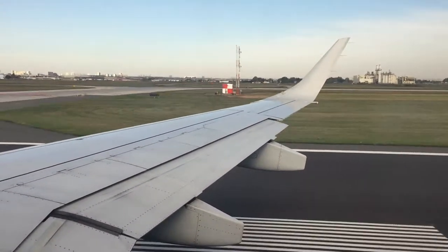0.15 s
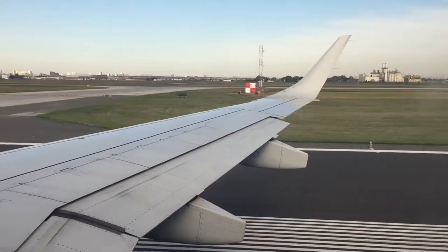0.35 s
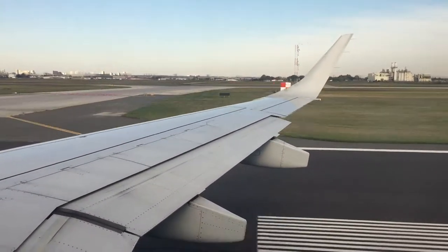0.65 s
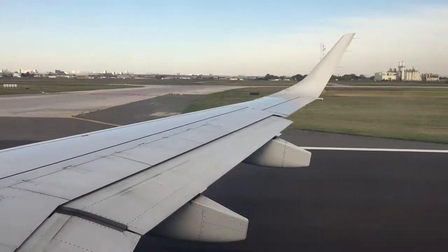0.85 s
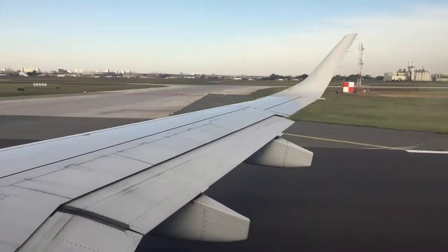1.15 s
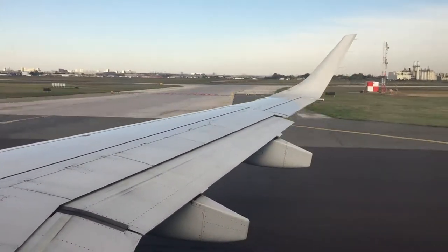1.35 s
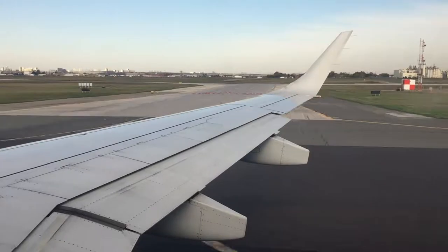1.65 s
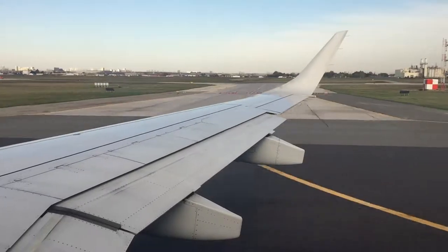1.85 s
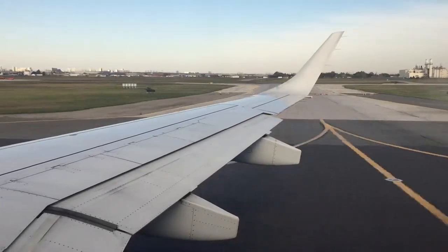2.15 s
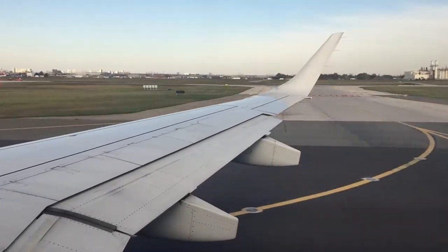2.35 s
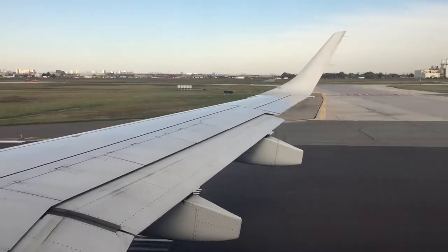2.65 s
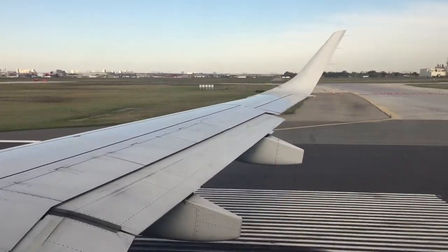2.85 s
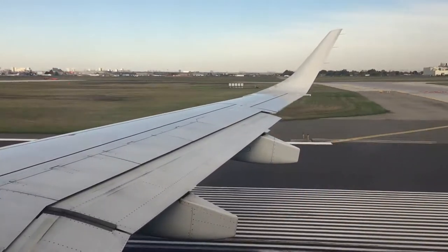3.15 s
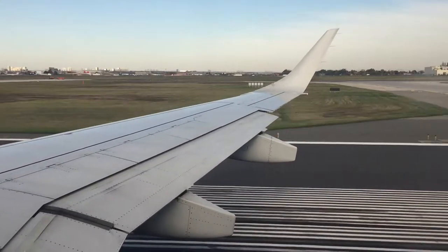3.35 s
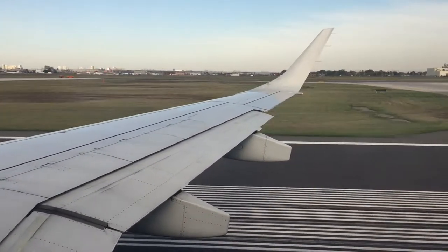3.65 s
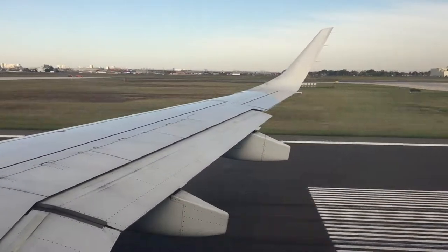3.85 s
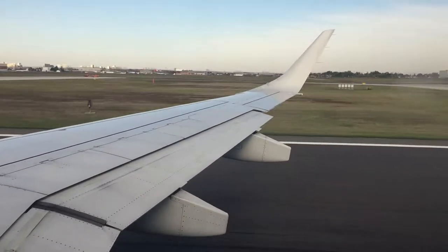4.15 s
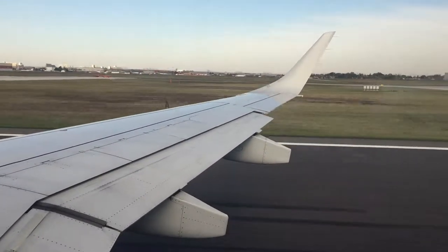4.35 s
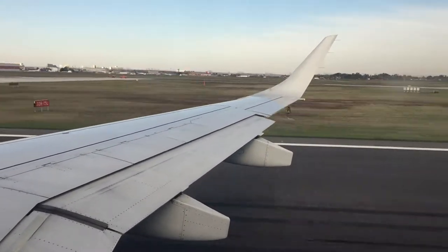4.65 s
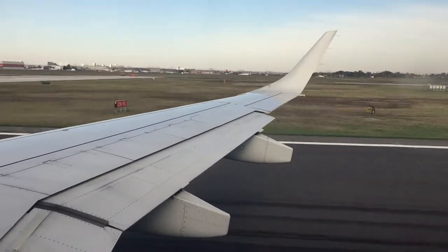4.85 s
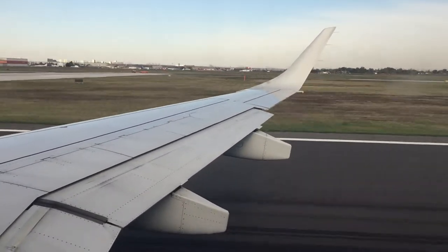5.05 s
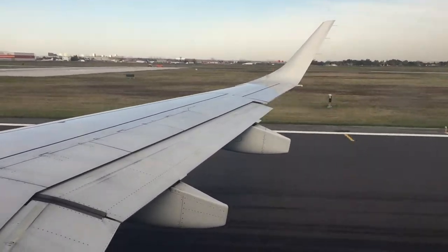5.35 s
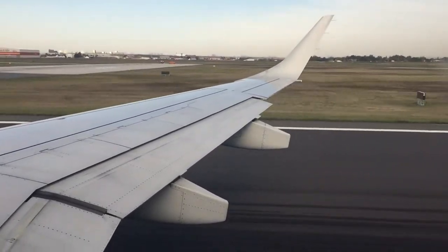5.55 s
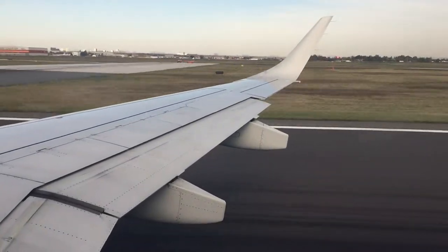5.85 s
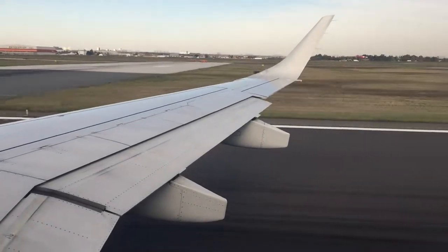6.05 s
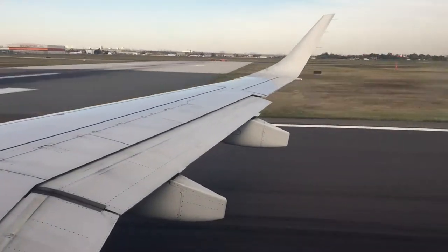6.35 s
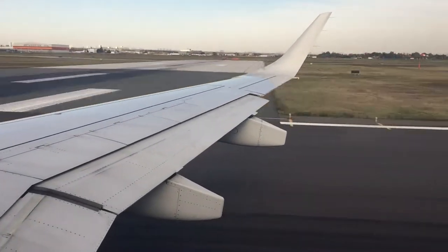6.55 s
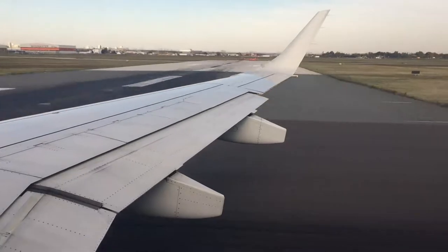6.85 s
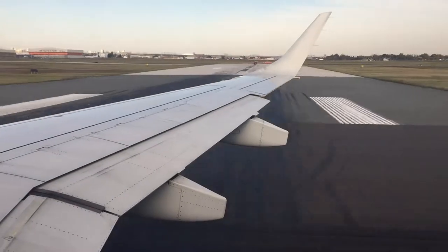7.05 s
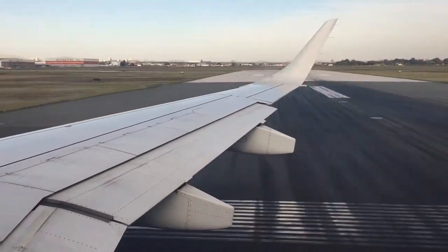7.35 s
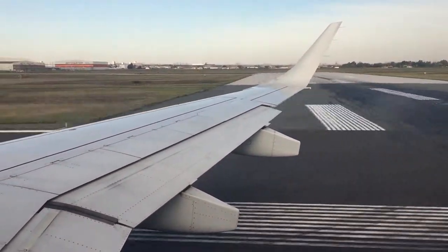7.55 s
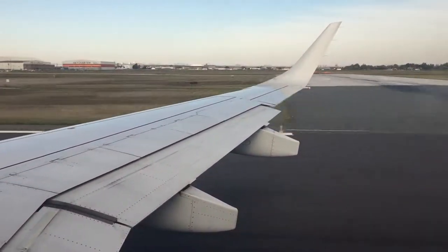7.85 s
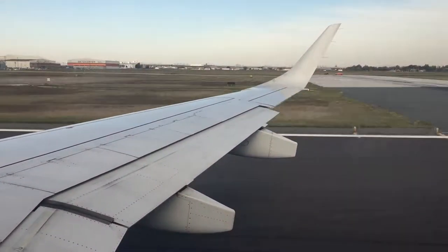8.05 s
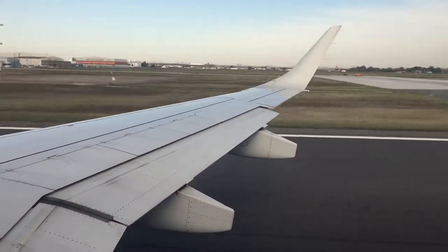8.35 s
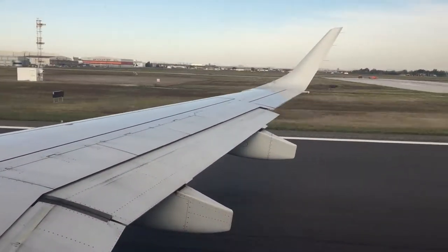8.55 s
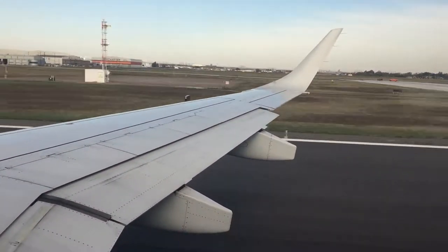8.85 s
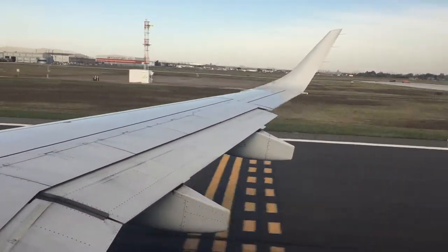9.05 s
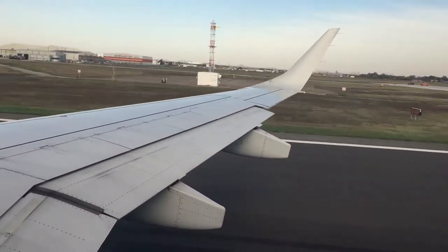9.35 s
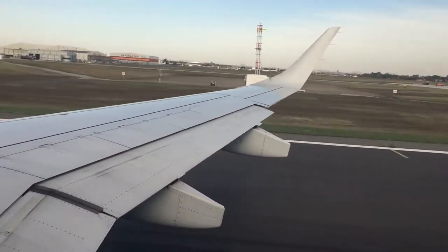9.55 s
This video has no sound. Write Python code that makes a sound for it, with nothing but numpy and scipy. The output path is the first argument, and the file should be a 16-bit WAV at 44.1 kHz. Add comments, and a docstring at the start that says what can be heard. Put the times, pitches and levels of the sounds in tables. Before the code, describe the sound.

A deep, booming roar of jet engines and rolling wheels fills an airliner cabin for the whole ten seconds or so, heard from a window seat behind the wing. The power holds steady, while the low rumble swells gently about once a second, most strongly around 8.5 seconds. Above it sit a low drone, wavering engine tones and a quieter turbine whine that keeps its pitch, briefly brightening near 5 seconds. Close by, loose plastic trim ticks and buzzes faintly in short, irregular fits throughout, a little harder around 3.4, 4.3 and 8.4 to 8.8 seconds. A small metal catch gives tiny high pings near 5.1, 6.9 and 8.7 seconds. At about 6.9 seconds a hard plastic fitting snaps once with a dry click. Behind everything, cabin air hisses softly with a very faint, high, fluttering whistle.

```python
"""A deep, booming roar fills an airliner cabin at takeoff power, at a window seat behind the wing.
Exhaust and wheels rumble through the fuselage, the boom swelling now and then; the engines
lay steady tones and bands of whine on top. Close by, loose trim buzzes in short fits at the rate of
the fan shaft, a plastic fitting clicks once and a metal catch pings. Behind it all, air hisses and
whistles thinly."""
import sys
import numpy as np
from scipy import signal
from scipy.fft import rfft, irfft, next_fast_len
from scipy.io import wavfile
from scipy.ndimage import uniform_filter1d

SR = 44100
rng = np.random.default_rng(int(sys.argv[2]) if len(sys.argv) > 2 else 0)


def persist_wave(psi):
    """Save psi, clipped to +-1, as 16-bit WAV."""
    counts = np.round(np.clip(psi, -1, 1) * 32767).astype(np.int16)
    wavfile.write(sys.argv[1], SR, np.atleast_2d(counts).T)


N = 427769
TIME = np.arange(N) / SR
SIZE = next_fast_len(N, real=True)
FREQS = np.maximum(np.arange(SIZE // 2 + 1) * SR / SIZE, 1)

# bed of exhaust and wheel roar through the wall: f/Hz, density/(dB per Hz)
ROAR_SPECTRUM = [(20, -67.5), (30, -76.5), (48, -47.5), (100, -38), (200, -46.5), (320, -57), (440, -59.5),
                 (510, -66.5), (720, -68.5), (830, -73.5), (1350, -79.5), (1900, -88.5), (2300, -98.5),
                 (5000, -126.4), (8000, -150)]
# low resonances of the cabin: f/Hz, width/Hz, density before swells/(dB per Hz)
CABIN_MODES = [(62.3, 18.6, -35), (105.24, 13.3, -36), (143.3, 22, -39.5), (191.9, 32.3, -41),
               (255, 23, -50.5), (283.3, 23, -50), (387.7, 50, -55.5), (434.6, 29, -59.5)]
# swells of the low rumble: t/s, swell of the lowest resonance/dB, swell of the next two/dB
BOOM_SWELLS = [(0.40, 0, 3.5), (1.12, 6, 3.5), (1.75, 5.5, 2.5), (2.33, 5, -4), (3.05, -1, 4.5),
               (3.72, 6.5, 0.5), (4.27, 0.5, 3), (4.55, 3.5, 3), (5.13, 6.5, 3.5), (5.85, 2.5, 0.5),
               (6.17, 3.5, 2.5), (6.68, 5, -3), (7.35, 5.5, 0), (7.78, 4.5, 2.5), (8.53, 9, 1),
               (8.88, 6, 1), (9.08, 3, 5), (9.45, 6, -2)]
# gain ride on the drone near 190 Hz: t/s, gain/dB
DRONE_RIDE = [(0, 3), (2.1, 0.5), (2.55, -1), (3.03, 4), (3.4, -2.5), (4.0, 0), (5.1, -3), (5.8, 1.5),
              (6.3, 3.5), (6.6, -0.5), (7.05, 2), (7.8, -1.5), (8.17, 2), (8.5, -5.5), (9.45, 3), (9.7, -3)]
# narrow bands of turbine whine: f/Hz, width/Hz, density before swells/(dB per Hz)
WHINE_BANDS = [(1043, 38, -73), (1215, 24, -73.5), (1622, 34, -79.3), (2088, 40, -87), (2250, 25, -95.5),
               (2455, 200, -93), (2577, 48, -87.5), (2823, 70, -89.7), (3028, 30, -96), (3133, 66, -88.5),
               (3200, 35, -95), (3316, 42, -89), (3430, 75, -90), (3540, 45, -92.5), (3596, 38, -83.8),
               (3665, 50, -89.8), (3738, 40, -92.5), (3815, 45, -93.5), (3888, 62, -89.5),
               (3985, 62, -89.2), (4063, 26, -89.5), (4125, 78, -88.7), (4237, 40, -93), (4570, 110, -101),
               (4760, 45, -101.5), (4860, 60, -99)]
# gain ride on the upper whine, scaled for each band by its depth: t/s, gain/dB
WHINE_RIDE = [(0, 1), (1.1, 0.8), (1.6, 1), (1.85, -3.5), (2.45, -2.5), (2.7, 2), (2.9, .7), (3.15, -4),
              (3.45, 0.5), (4.0, -0.5), (4.6, 1.5), (4.92, 1), (5.12, 5), (5.4, -2.5), (5.7, 0), (6.55, -1),
              (7.1, -4.5), (7.55, -0.5), (7.9, -2), (9.0, 1.3), (9.7, -1)]
# how deeply a band follows that ride: f/Hz, depth/factor
WHINE_RIDE_DEPTH = [(2400, .35), (3100, .7), (3700, 1.15)]
# tones of rotating machinery: f/Hz, centre level/dB rms, pitch wander/Hz
MACHINE_TONES = [(277, -46, .5), (1197, -62.5, 6), (2132, -77, 4), (2391, -76.2, 2), (4346, -80.5, 6),
                 (5060, -81, 6)]
# the tone at ten times the shaft rate: t/s, centre level/dB rms
SHAFT_TONE_LEVEL = [(0, -54), (0.32, -49.5), (0.6, -57.5), (1.0, -55), (1.4, -54.5), (2.0, -54),
                    (2.55, -52.5), (3.0, -55), (4.3, -56), (4.65, -69), (5.0, -51.5), (5.6, -54),
                    (6.3, -58.5), (6.9, -53), (7.8, -62), (8.2, -56), (9.35, -58), (9.6, -54)]
# ring of the plastic trim: f/Hz, width/Hz, relative level/dB
TRIM_MODES = [(3620, 740, 0), (5350, 850, 0.8), (6100, 850, -1.8), (6950, 700, 0.3), (8150, 750, -2.2),
              (9300, 1400, -8.5), (10950, 750, -10), (12500, 2200, -17), (14800, 2500, -21)]
# ticks and fits of the trim: t/s and level/dB of the hardest touch, touches before, touches after
BUZZ_FITS = [(0.169, -58, 0, 1), (0.252, -58, 0, 1), (0.338, -55, 1, 1), (0.715, -56, 1, 0),
             (0.794, -57, 0, 1), (0.910, -53, 0, 1), (1.071, -54, 3, 0), (1.107, -52, 1, 1),
             (1.149, -52.5, 0, 1), (1.205, -55, 0, 0), (1.269, -54, 1, 0), (1.296, -54, 0, 0),
             (1.406, -54, 0, 2), (1.617, -58, 0, 1), (1.932, -56, 1, 0), (1.987, -55, 0, 2),
             (2.157, -53, 2, 2), (2.284, -57.5, 0, 1), (2.513, -52, 2, 0), (2.525, -52, 0, 1),
             (2.725, -54.5, 0, 1), (2.863, -57.5, 0, 0), (2.993, -55, 0, 2), (3.059, -57, 0, 1),
             (3.108, -56, 1, 1), (3.350, -56, 0, 0), (3.432, -47.5, 2, 4), (3.617, -52.5, 2, 0),
             (3.641, -51.5, 1, 1), (3.702, -54, 0, 2), (4.008, -54.5, 0, 1), (4.035, -55.5, 0, 0),
             (4.108, -57, 0, 1), (4.270, -49.5, 1, 1), (4.444, -56.5, 0, 0), (5.050, -51.5, 3, 1),
             (5.107, -54.5, 0, 2), (5.239, -56, 1, 1), (5.515, -56.5, 0, 1), (5.657, -57.5, 0, 1),
             (5.757, -57.5, 1, 0), (5.882, -57.5, 0, 0), (6.296, -53.5, 2, 0), (6.420, -56, 1, 1),
             (6.722, -55, 0, 0), (6.892, -55.5, 2, 0), (7.384, -57.5, 1, 1), (7.738, -53.5, 0, 1),
             (7.881, -54, 2, 0), (8.340, -55.5, 0, 0), (8.365, -54, 0, 0), (8.377, -50, 0, 1),
             (8.547, -53, 0, 1), (8.630, -53, 0, 1), (8.715, -52, 2, 0), (8.796, -51.5, 0, 0),
             (8.804, -53.5, 0, 2), (8.923, -56.5, 0, 1), (9.112, -55, 1, 0)]
# snap of the fitting: t/s, peak level/dB
CLICKS = [(6.906, -35)]
# ring of the fitting: f/Hz, width/Hz, relative level/dB
FITTING_MODES = [(2650, 650, -4), (3500, 950, 0), (7600, 2500, -19), (9700, 900, -19), (12000, 1000, -21),
                 (14000, 1800, -25)]
# pings of the catch: t/s, peak level/dB
PINGS = [(5.106, -57), (5.131, -59), (6.866, -55.5), (6.878, -55.5), (6.890, -53.5), (6.915, -55),
         (8.713, -58)]
# colour of the air hiss: f/Hz, density before gain/(dB per Hz)
HISS_SPECTRUM = [(1000, -101.5), (2300, -99.3), (3000, -97.5), (4100, -94.5), (4700, -101), (6400, -104.6),
                 (7000, -104), (7600, -110.3), (9300, -109.8), (10500, -117.8), (11500, -115),
                 (13500, -120), (16000, -121.5)]
# thin air whistle that fades and returns: t/s, f/Hz, level before flutter/dB rms
UPPER_WHISTLE = [(0, 14780, -86), (0.9, 14570, -82.5), (1.5, 14600, -90), (1.85, 14550, -79),
                 (2.5, 14540, -77.5), (3.1, 14490, -80.5), (4.2, 14360, -84), (4.45, 14470, -90.5),
                 (5.15, 14350, -89.5), (5.35, 14360, -79.5), (5.9, 14560, -76), (6.6, 14400, -79.5),
                 (7.21, 14550, -88), (7.27, 14480, -77.5), (7.6, 14400, -84), (7.9, 14400, -78.5),
                 (8.3, 14400, -81.5), (8.55, 14470, -88), (8.85, 14570, -80), (9.7, 14810, -84)]
# second whistle under it, early and late: t/s, level before flutter/dB rms
LOWER_WHISTLE = [(0, -81), (0.8, -84), (1.3, -92), (1.7, -105), (8.5, -105), (8.8, -82), (9.7, -83.5)]

SHAFT_HZ = 80.85
FRINGE_DB = -56.3  # trim touches at the edge of a fit; also the ceiling of the chatter


def roar(swell_half_width_s=.11):
    """Exhaust and wheels stir the cabin's modes: the lowest three swell now and then, the fourth drones."""
    boom, thud, knock, drone = (compress(ringing_noise([mode])) for mode in CABIN_MODES[:4])
    boom_db = thud_db = 0
    for s, lowest_db, next_db in BOOM_SWELLS:
        swell = np.exp(-((TIME - s) / swell_half_width_s) ** 2)
        boom_db += swell * lowest_db
        thud_db += swell * next_db
    rumble = from_db(boom_db) * boom + from_db(thud_db) * (thud + knock)
    drone_db, = automation(DRONE_RIDE)
    bed = noise(eq_curve(ROAR_SPECTRUM)) + ringing_noise(CABIN_MODES[4:])
    return rumble + from_db(drone_db) * drone + bed


def turbine_whine(sway_db, split_hz=2200):
    """The turbines' low bands hold steady; the upper ones swell together, each with a sway of its own."""
    ride_db, = automation(WHINE_RIDE)
    whine = ringing_noise([band for band in WHINE_BANDS if band[0] <= split_hz])
    for hz, width, db in WHINE_BANDS:
        if hz > split_hz:
            depth = np.interp(hz, *np.transpose(WHINE_RIDE_DEPTH))
            gain = from_db(depth * ride_db + sway_db * drift(5.5))
            whine += gain * ringing_noise([(hz, width, db)])
    return whine


def machine_tones(waver_db, shaft_waver_db):
    """Rotating parts sing near-pure, wavering tones; the shaft tone fades and returns."""
    steady = sum(tone(hz, db + waver_db * drift(6.4), wander) for hz, db, wander in MACHINE_TONES)
    shaft_db, = automation(SHAFT_TONE_LEVEL)
    return steady + tone(10 * SHAFT_HZ, shaft_db + shaft_waver_db * drift(7), wander_hz=0.54)


def trim_buzz(uneven_db, restless_db, chatter_db=-69.5, decay_s=.0023):
    """Loose trim touches once per shaft turn: a faint chatter throughout, a hard buzz in each fit."""
    turns = np.arange(0, N / SR, 1 / SHAFT_HZ)
    unrest_db = restless_db * np.interp(turns, TIME, drift(16))
    unrest_db += uneven_db * rng.standard_normal(len(turns))
    jitter_s = rng.normal(0, .001, len(turns))
    chatter = contacts(turns + jitter_s, np.minimum(chatter_db + unrest_db, FRINGE_DB), decay_s)
    fits = list(BUZZ_FITS) + weak_fits(turns)
    times, levels_db = np.vstack([fit_touches(*fit) for fit in fits]).T
    buzz = contacts(times - decay_s / 2, levels_db, decay_s)
    return struck(np.maximum(chatter, buzz), TRIM_MODES)


def weak_fits(turns, per_s=1.0, level_db=-62.5, spread_db=3):
    """Any shaft turn may set off a faint double touch; rows as in BUZZ_FITS."""
    chosen = rng.random(len(turns)) < per_s / SHAFT_HZ
    levels_db = level_db + spread_db * rng.standard_normal(len(turns))
    return [(s, db, 0, 1) for s, db in zip(turns[chosen], levels_db[chosen])]


def fit_touches(s, db, before, after):
    """One touch per shaft turn, softer to either side of the hardest; rows of t/s, level/dB."""
    turns = np.arange(-before, after + 1)
    reach = np.where(turns < 0, before, after) + 1
    taper_db = min(FRINGE_DB - db, -1) * np.sqrt(np.abs(turns) / reach)
    return np.column_stack([s + turns / SHAFT_HZ, db + taper_db])


def fitting_click(scrape_db=-14):
    """A dry snap of hard plastic rings all the fitting's modes at once, then settles with a scrape."""
    modes = [from_db(db) * resonance(hz, width) for hz, width, db in FITTING_MODES]
    snap = irfft(sum((-1) ** k * mode for k, mode in enumerate(modes)), SIZE)[:N]
    snap /= np.abs(snap).max()
    times, levels_db = np.transpose(CLICKS)
    scrape = struck(contacts(times, levels_db + scrape_db, decay_s=.002), FITTING_MODES)
    return scrape + sum(from_db(db) * np.roll(snap, round(s * SR)) for s, db in CLICKS)


def catch_pings(ring_hz=8100):
    """A small metal catch is shaken now and then and rings at one high pitch."""
    times, levels_db = np.transpose(PINGS)
    return contacts(times, levels_db, decay_s=.003) * np.sin(2 * np.pi * ring_hz * TIME)


def air_whistles(wander_hz, gap_hz=510, flutter_db=2.8):
    """A thin, fluttering air whistle, shadowed at times by a lower one."""
    pitch_hz, upper_db = automation(UPPER_WHISTLE)
    lower_db, = automation(LOWER_WHISTLE)
    pitch_hz += wander_hz * drift(8)
    upper = from_db(upper_db) * whistle(pitch_hz)
    lower = from_db(lower_db) * whistle(pitch_hz - gap_hz)
    flutter = from_db(flutter_db * (drift(28) - .5))
    return flutter * (upper + lower)


def whistle(pitch_hz, half_width_hz=115):
    """A narrow band of turbulence that follows a pitch."""
    band = 1 / (1 + (FREQS / half_width_hz) ** 2)
    phase = 2 * np.pi * np.cumsum(pitch_hz) / SR
    return unit_rms(noise(band) * np.cos(phase) + noise(band) * np.sin(phase))


def air_hiss(gain_db, flicker_db, shimmer_db=1.7):
    """Cabin air hisses with a soft flicker; its treble bands drift apart in level, shifting the colour."""
    gain = from_db(gain_db + flicker_db * drift(24))
    spectrum = rfft(rng.standard_normal(SIZE)) * eq_curve(HISS_SPECTRUM) * np.sqrt(SR / 2)
    centres_hz = np.linspace(4500, 14000, 25)
    hiss = np.zeros(N)
    for k, solo in enumerate(np.eye(len(centres_hz))):
        band = irfft(spectrum * np.interp(FREQS, centres_hz, solo), SIZE)[:N]
        depth_db = shimmer_db if k > 0 else 0
        hiss += from_db(depth_db * drift(3)) * band
    return gain * hiss


def contacts(times, levels_db, decay_s):
    """Force of brief touches with an instant attack and an exponential decay."""
    hits = np.zeros(N)
    onsets = np.round(np.asarray(times) * SR).astype(int)
    hits[np.clip(onsets, 0, N - 1)] = from_db(levels_db)
    return signal.lfilter([1], [1, -np.exp(-1 / (decay_s * SR))], hits + 1e-18)


def struck(force, modes, tail_s=.008, tail_db=-7.5):
    """Rough contacts excite each mode; nearby walls smear some of their power into a short tail."""
    feedback = np.exp(-1 / (tail_s * SR))
    tail_power = signal.lfilter([1 - feedback], [1, -feedback], (from_db(tail_db) * force) ** 2)
    envelope = np.sqrt(force ** 2 + tail_power)
    responses = [from_db(db) * resonance(hz, width) for hz, width, db in modes]
    power = sum(np.mean(np.abs(r) ** 2) for r in responses)
    spectrum = sum(rfft(envelope * rng.standard_normal(N), SIZE) * r for r in responses)
    return irfft(spectrum, SIZE)[:N] / np.sqrt(power)


def ringing_noise(modes):
    """Resonances, each stirred by turbulence of its own."""
    return sum(noise(from_db(db) * resonance(hz, width)) for hz, width, db in modes)


def compress(x, window_s=.22, amount=.6):
    """Iron out part of the slow level swings, keeping the overall level."""
    power = uniform_filter1d(x ** 2, round(window_s * SR))
    return np.std(x) * unit_rms(x / power ** (amount / 2))


def tone(hz, db, wander_hz):
    """A sine that wanders a little in pitch."""
    phase = 2 * np.pi * np.cumsum(hz + wander_hz * drift(4)) / SR
    return np.sqrt(2) * from_db(db) * np.sin(phase)


def noise(response):
    """Noise whose amplitude per root hertz follows the response."""
    return irfft(rfft(rng.standard_normal(SIZE)) * response, SIZE)[:N] * np.sqrt(SR / 2)


def resonance(hz, width_hz):
    """Causal response of a steep-sided resonance, unity gain at the peak."""
    return 1 / (1 + 1j * (FREQS ** 2 - hz ** 2) / (FREQS * width_hz)) ** 2


def drift(rate_hz):
    """Smooth random modulation at unit rms."""
    grid = TIME[::50]
    hz = np.fft.rfftfreq(len(grid), grid[1])
    spectrum = rfft(rng.standard_normal(len(grid))) / (1 + (hz / rate_hz) ** 2) ** 2
    return np.interp(TIME, grid, unit_rms(irfft(spectrum, len(grid))))


def eq_curve(points):
    """Gain at every frequency from breakpoints of f/Hz, level/dB."""
    hz, db = np.transpose(points)
    return from_db(np.interp(np.log(FREQS), np.log(hz), db))


def automation(rows):
    """Straight ramps between breakpoints, one lane for each column after t/s."""
    times, *lanes = np.transpose(rows)
    return [np.interp(TIME, times, lane) for lane in lanes]


def from_db(db):
    """Decibels to gain."""
    return 10 ** (np.asarray(db) / 20)


def unit_rms(x):
    """Scale to unit power."""
    return x / np.sqrt(np.mean(x ** 2) + 1e-30)


def scene():
    """The mono mix: engines and wheels at steady power, a thin layer of air, rattles close by."""
    engines = roar() + turbine_whine(sway_db=1.6) + machine_tones(waver_db=3.0, shaft_waver_db=2.5)
    air = air_whistles(wander_hz=25) + air_hiss(gain_db=-0.5, flicker_db=1.2)
    rattles = trim_buzz(uneven_db=3.0, restless_db=-0.5) + fitting_click() + catch_pings()
    return (engines + air + rattles)[None]


def record(dry, low_cut_hz=27, high_cut_hz=15760):
    """The microphone sheds the deepest rumble; the top is cut steeply."""
    low_cut = signal.butter(2, low_cut_hz, "high", fs=SR, output="sos")
    high_cut = signal.ellip(12, .1, 80, high_cut_hz, fs=SR, output="sos")
    return signal.sosfilt(high_cut, signal.sosfilt(low_cut, dry))


dry = scene()
out = record(dry)
persist_wave(out)
```